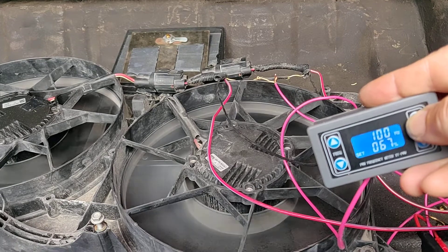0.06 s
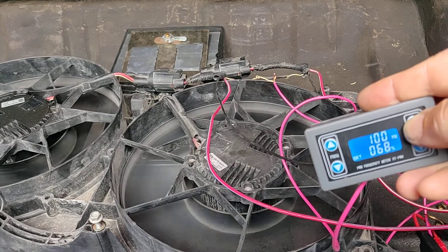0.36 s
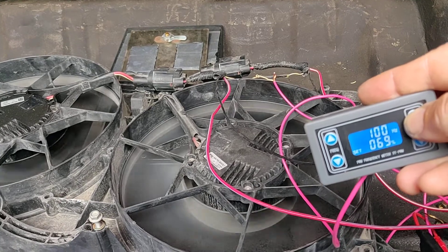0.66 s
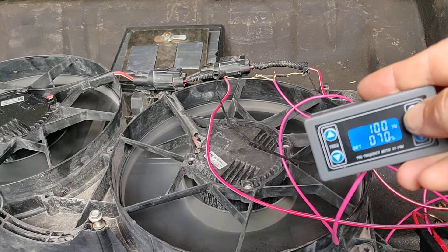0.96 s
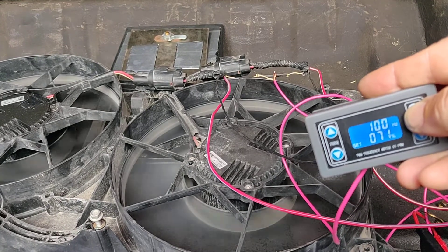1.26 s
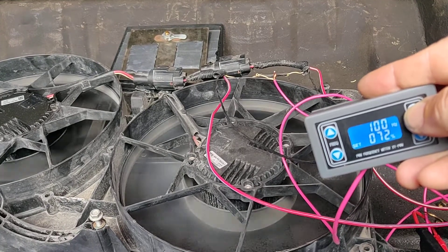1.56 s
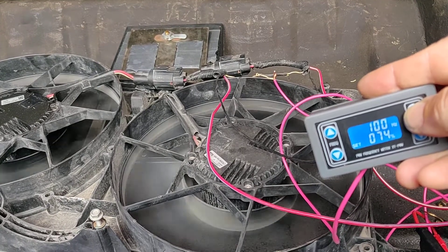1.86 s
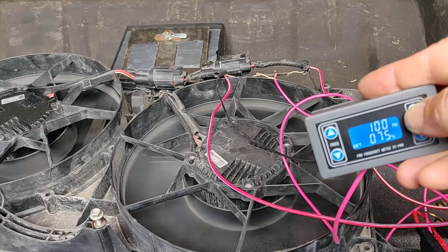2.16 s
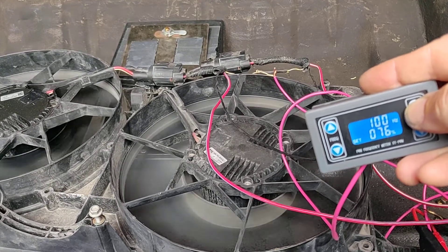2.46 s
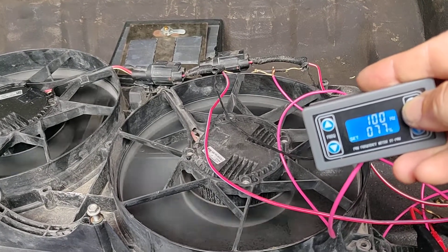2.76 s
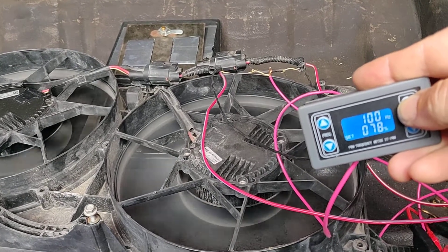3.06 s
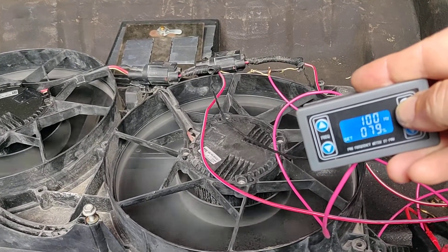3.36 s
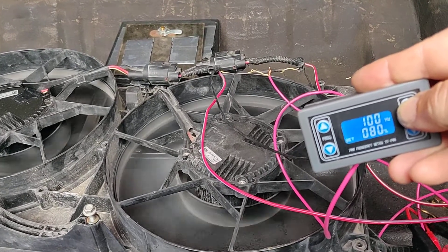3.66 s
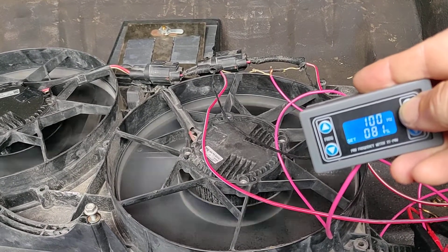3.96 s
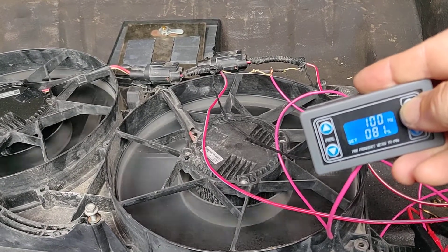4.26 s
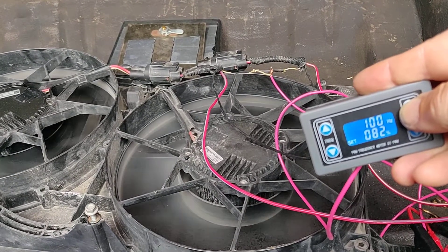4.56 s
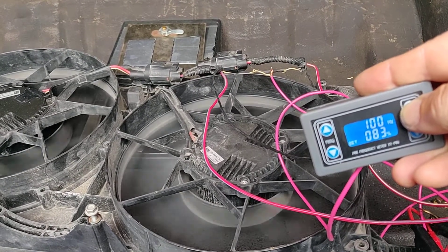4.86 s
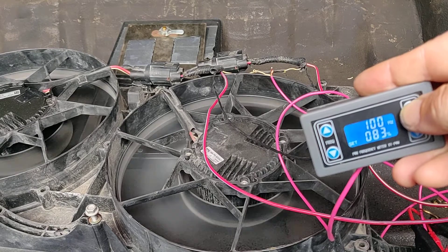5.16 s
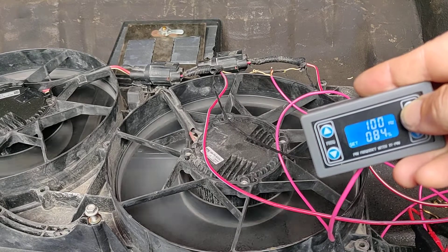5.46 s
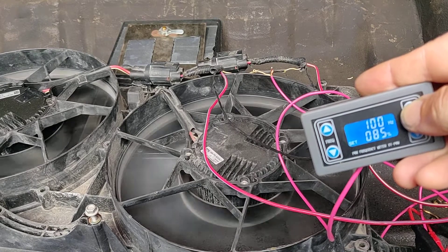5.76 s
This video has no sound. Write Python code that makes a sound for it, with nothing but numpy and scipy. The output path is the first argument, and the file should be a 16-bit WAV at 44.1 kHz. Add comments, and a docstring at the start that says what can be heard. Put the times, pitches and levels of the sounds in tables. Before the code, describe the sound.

A continuous rush of air comes from a pair of electric cooling fans just below the microphone, with ragged wind buffeting and rumble throughout, stronger on the left. A rough whine sits inside the noise and slowly becomes clearer. From the middle, a few short, faint, high whistling chirps come in small groups. The fan noise starts at its loudest and eases toward the end, while the gusts keep thumping.

```python
"""Two electric radiator fans run on a battery as their controller is turned up, a phone just above them.
Blade turbulence makes a broadband rush, coloured by the air resonances of the shrouds, with a hoarse
whine; midway a thin edge tone starts to chirp on and off. Eddies in the draught buffet the two
microphone ports, mostly the left, and the phone's limiter ducks everything after each hard gust."""
import sys
import numpy as np
from scipy import signal
from scipy.fft import rfft, irfft
from scipy.io import wavfile
from scipy.ndimage import uniform_filter1d, minimum_filter1d, map_coordinates

SR = 44100
rng = np.random.default_rng(int(sys.argv[2]) if len(sys.argv) > 2 else 0)


def to_wav(sig):
    """Store sig (one row per channel, or 1-D mono) as 16-bit WAV at the path in sys.argv[1].

    Samples outside -1..1 are clipped; the rate is SR.
    """
    pcm = np.clip(np.atleast_2d(sig), -1, 1) * 32767
    pcm = np.round(pcm).astype(np.int16)
    wavfile.write(sys.argv[1], SR, pcm.T)  # frames by channels


N = 265020
TIME = np.arange(N) / SR
FREQ = np.maximum(np.arange(N // 2 + 1) * SR / N, 1)

# Level of the rush and draught, which drops after the big gusts: t/s, relative level/dB
LEVEL = [(0, 3), (1.2, -0.5), (1.9, 0.3), (3.15, -1.6), (5.1, -5.5), (5.3, -9), (5.62, -7), (6, -8)]
# Relative spectrum of the rush up to about 9.8 kHz; above that, a barely audible hiss floor:
# f/Hz, left level/dB, right level/dB
RUSH_SPECTRUM = [(150, -40.5, -44.5), (314, -50.5, -51), (473, -54, -56.5), (795, -57.5, -56.5),
                 (1190, -56, -57), (1730, -55, -59.5), (2214, -57, -64), (3000, -63.5, -68.5),
                 (4500, -64.5, -71), (6100, -59.5, -75.5), (7060, -77.5, -72.5), (7330, -77, -75.5),
                 (8530, -99, -73.5), (9170, -108, -86.5), (9800, -113, -116), (12900, -105, -106),
                 (13500, -111, -112)]
# Air resonances of the shrouds, relative to that spectrum: f/Hz, width/Hz, left level/dB, right level/dB
SHROUD_MODES = [(403, 190, -2.5, -2), (557, 25.3, 8, 7), (657, 39, 3.5, 2.5), (855, 89, 6.5, 1.5),
                (1080, 58, 3.5, -5), (1236, 116, 2, -9), (1339, 39, 7, -11.5), (1588, 101, 2, -24.5),
                (1934, 55, -0.5, -22), (2158, 80, -1, -14), (2700, 220, 0, -26.5)]
# Relative spectral density of the steady draught: f/Hz, left level/dB, right level/dB
DRAUGHT_SPECTRUM = [(10, -40.5, -43.5), (30, -26.5, -26), (80.6, -28.5, -30.5), (166.5, -36.5, -31),
                    (273, -62, -81.5), (605, -83.5, -84), (1500, -122.5, -100)]
# Hard gusts (small, fast eddies carry little bass): t/s, length/s, peak level/dB, low f/Hz, top f/Hz, port
HARD_GUSTS = [(0.028, .03, 1.5, 75, 560, "left"), (0.103, 0.015, 3, 70, 420, "left"),
              (0.142, .036, 4.5, 65, 560, "left"), (0.17, 0.017, 9.5, 100, 890, "left"),
              (0.232, .01, 1.5, 298, 890, "left"), (0.321, 0.039, 9, 109, 504, "left"),
              (0.371, .034, -2, 30, 260, "left"), (.447, 0.021, 5.5, 129, 950, "left"),
              (0.464, .014, 7, 40, 180, "left"), (0.553, .02, 3, 60, 380, "left"),
              (0.575, .024, 6, 60, 440, "left"), (.696, .042, -5.5, 30, 300, "right"),
              (.757, 0.038, -1, 40, 480, "left"), (0.814, 0.057, 0.5, 26, 196, "right"),
              (0.907, 0.032, 2.5, 30, 504, "left"), (.925, .026, 4, 40, 456, "left"),
              (1.021, 0.02, 2, 91, 680, "left"), (1.088, 0.047, 4.5, 26, 266, "left"),
              (1.132, 0.03, 10, 35, 640, "left"), (1.273, 0.056, 1, 60, 635, "left"),
              (1.374, 0.033, -4, 26, 160, "right"), (1.421, 0.047, 2, 110, 380, "left"),
              (1.487, 0.032, -4.5, 30, 220, "left"), (1.519, 0.073, -4, 30, 220, "right"),
              (1.565, 0.056, -0.5, 35, 255, "left"), (1.636, 0.043, -6.5, 35, 260, "left"),
              (1.71, 0.041, -2, 50.3, 457, "left"), (1.776, .065, 0, 40, 376, "left"),
              (1.915, 0.026, -7.5, 26, 130, "right"), (2.079, .03, -2, 30, 200, "right"),
              (2.088, .028, 1, 138, 680, "left"), (2.131, 0.082, 0.5, 45, 450, "left"),
              (2.193, .025, -4.5, 35, 300, "left"), (2.264, 0.06, 0, 34.9, 443, "left"),
              (2.431, 0.031, .5, 45, 500, "left"), (2.545, 0.015, 2.5, 195, 704, "left"),
              (2.573, .056, 0.5, 70, 460, "left"), (2.647, .07, -1.5, 40.4, 243, "left"),
              (2.668, 0.017, 0.5, 26.3, 170, "right"), (2.811, .016, -1.5, 26, 150, "right"),
              (2.857, .068, 2, 38, 474, "left"), (3.122, 0.077, -7, 30, 232, "left"),
              (3.202, 0.017, 17.5, 45, 770, "left"), (3.354, .06, -3.5, 26, 140, "left"),
              (3.49, .06, -6.5, 25.8, 140, "left"), (3.522, .028, -2, 69.6, 554, "left"),
              (3.654, 0.023, 0.5, 26, 124, "right"), (3.786, 0.023, -12, 26, 180, "left"),
              (3.878, 0.015, 0.5, 89, 710, "left"), (4.123, .06, -2.5, 30, 282, "left"),
              (4.333, 0.052, 2, 30, 222, "left"), (4.508, 0.057, -0.5, 26, 191, "left"),
              (4.523, 0.037, -7, 30, 180, "right"), (4.579, .012, -0.5, 372, 1020, "left"),
              (4.586, 0.0097, -0.5, 40, 170, "left"), (4.675, 0.012, -0.5, 50, 330, "left"),
              (4.772, 0.036, -7.5, 26, 150, "right"), (4.894, .075, -5, 60.4, 313, "left"),
              (4.975, .036, -1, 40, 400, "left"), (4.986, 0.082, -5, 26, 226, "right"),
              (5.036, 0.034, -5, 35, 245, "left"), (5.127, .04, -12, 26, 150, "right"),
              (5.18, .034, -8, 49, 383, "left"), (5.2, 0.0094, 7.5, 40.6, 157, "left"),
              (5.409, 0.038, -2.5, 55, 370, "left"), (5.638, 0.082, -8.5, 26, 180, "right"),
              (5.778, 0.035, -13, 26, 160, "left"), (5.957, 0.023, 0, 168, 600, "left"),
              (5.989, .035, 3, 40, 382, "left")]
# Chirps of the edge tone: t/s, length/s, level/dB, f/Hz
CHIRPS = [(2.96, .11, -43, 2320), (3.11, .12, -45, 2316), (3.99, .04, -33, 2314), (4.045, .028, -38, 2330),
          (4.089, .048, -36, 2310), (4.505, .09, -43, 2304), (4.56, .048, -38, 2300),
          (4.648, .05, -38.5, 2305), (4.738, .062, -36.5, 2312)]


def undb(db):
    """Amplitude ratio of a level: a factor of ten for every 20 dB."""
    return 10 ** (np.asarray(db) / 20)


def noise(gain):
    """Filtered white noise: amplitude per root Hz follows gain, with one independent row per row of gain."""
    white = rng.standard_normal(np.shape(gain)[:-1] + (N,))
    return irfft(rfft(white) * gain, N) * np.sqrt(SR / 2)


def port_gains(spectrum):
    """Left and right frequency response, with level interpolated over log frequency."""
    hz, *sides = np.transpose(spectrum)
    return undb([np.interp(np.log(FREQ), np.log(hz), db) for db in sides])


def fluctuation(rate_hz):
    """Low-passed noise: a smooth random signal of unit standard deviation."""
    slow = noise(1 / (1 + (FREQ / rate_hz) ** 4))
    return slow / slow.std()


def swell(centre, length, steepness):
    """A rounded plateau whose full width at half height is length."""
    return 2 ** -np.minimum(np.abs(2 * (TIME - centre) / length), 10) ** steepness


def resonance(hz, width_hz):
    """Forced resonance: air driven by turbulence rings in a narrow band, with unit gain at the centre."""
    return noise(1 / (1 + ((FREQ - hz) / width_hz) ** 2) ** 1.24)


def blade_rush(hiss_db, diffuse_db=-3, direct_db=-8, flutter_db=1, low_hz=120, hiss_hz=3000, lag_s=65e-6):
    """Turbulence noise: a diffuse field, plus direct sound and shroud modes that reach the left first."""
    spectrum = port_gains(RUSH_SPECTRUM) / (1 + (low_hz / FREQ) ** 4)
    diffuse = noise(spectrum * undb(diffuse_db)) * undb(flutter_db * fluctuation(rate_hz=14))
    direct = rfft(noise(undb(direct_db)))
    for hz, width_hz, left_db, right_db in SHROUD_MODES:
        direct = direct + rfft(resonance(hz, width_hz)) * undb([[left_db], [right_db]])
    port_delay = np.exp(-2j * np.pi * FREQ * np.array([[0], [lag_s]]))
    rush = diffuse + irfft(direct * spectrum * port_delay, N)
    hiss = irfft(rfft(rush) / (1 + (hiss_hz / FREQ) ** 4), N)
    return rush + (undb(hiss_db) - 1) * hiss  # treble shelf of hiss_db


def whine(hz=1575, width_hz=33, wander_hz=16, right_db=-12):
    """Narrow-band noise is heard as a hoarse pitch; frequency modulation makes it wander."""
    ring = resonance(hz, width_hz)
    drift_samples = np.cumsum(wander_hz / hz * fluctuation(rate_hz=9))
    ring = map_coordinates(ring / ring.std(), [np.arange(N) + drift_samples], mode="mirror")
    return ring * undb([[0], [right_db]])


def draught(flutter_db=2.6, flutter_hz=11):
    """Turbulent pressure: small eddies rumble and flutter, uncorrelated between the two ports."""
    rumble = noise(port_gains(DRAUGHT_SPECTRUM))
    flutter = np.array([fluctuation(flutter_hz), fluctuation(flutter_hz)])
    return rumble * undb(flutter_db * flutter)


def gusts(rows, body_ratio=0.37, edge_speed=0.3, drive=0.45, ragged_db=3.5):
    """Convection: large eddies sweep past a port as ragged bursts, brightest where the air is fastest."""
    pressure = np.zeros(N)
    ragged = undb(ragged_db * np.tanh(fluctuation(rate_hz=70)))
    for centre, length, peak_db, low_hz, top_hz in rows:
        near = np.abs(TIME - centre) < 2 * length
        speed = (swell(centre, length, steepness=1.936) * ragged)[near]
        body_hz = max(body_ratio * top_hz, 2 * low_hz)
        body = signal.butter(1, [low_hz, body_hz], "bandpass", fs=SR, output="sos")
        rolloff = signal.butter(2, top_hz, fs=SR, output="sos")
        eddy = signal.sosfilt(body, rng.standard_normal(N // 8))
        eddy = signal.sosfilt(rolloff, eddy)
        # the swirls pass at the speed of the air, so the edges of the burst are dull
        travel = np.cumsum(edge_speed + (1 - edge_speed) * speed)
        eddy = np.interp(travel, np.arange(len(eddy)), eddy)
        burst = np.tanh(drive * eddy / eddy.std()) * speed  # the pressure peaks flatten off
        pressure[near] += undb(peak_db) * burst / np.abs(burst).max()
    return pressure


def puffs(mean_db, per_s=5, length_s=0.05, spread_db=3.5, low_hz=28, top_hz=290, db_per_octave=10.5):
    """Intermittent turbulence: soft eddies arrive at loosely even times, the stronger ones brighter."""
    jitter, weakness = rng.random((64, 2)).T
    times = (np.arange(len(jitter)) + jitter) / per_s
    extra_db = spread_db * (1 - 2 * weakness)
    return gusts([(t, length_s, mean_db + db, low_hz, top_hz * 2 ** (db / db_per_octave))
                  for t, db in zip(times, extra_db) if t < N / SR])


def edge_tone(waver_hz=11, sag_hz_per_s=500, rough_db=2.5, right_db=-2):
    """Edge tone: air whistles over an edge in short chirps, each sagging a little in pitch."""
    waver = waver_hz * fluctuation(rate_hz=75)
    whistle = np.zeros(N)
    for centre, length, db, hz in CHIRPS:
        pitch = hz + waver - sag_hz_per_s * np.clip(TIME - centre, -length, length)
        tone = np.sqrt(2) * np.sin(2 * np.pi * np.cumsum(pitch) / SR)
        whistle += undb(db) * swell(centre, length, steepness=3) * tone
    roughness = undb(rough_db * np.tanh(fluctuation(rate_hz=70)))
    return whistle * roughness * undb([[0], [right_db]])


def scene():
    """Superposition of the sound of the fans and the pressure of their draught on the ports."""
    level_db = np.interp(TIME, *np.transpose(LEVEL))
    rush = blade_rush(hiss_db=0.57 + 0.2 * level_db)  # the hiss fades a little faster than the body
    whine_db = -36 + 0.98 * TIME  # the whine stands out more as the controller is turned up
    fans = (rush + whine() * undb(whine_db)) * undb(level_db)
    whistle = edge_tone()
    rumble = draught() * undb(-10.5)
    hard = np.array([gusts([row[:-1] for row in HARD_GUSTS if row[-1] == port])
                     for port in ("left", "right")])
    soft = np.array([puffs(mean_db=-12), puffs(mean_db=-11.5)])
    wind = (rumble + soft) * undb(0.69 * level_db)  # sinks less steeply than the rush
    return fans + whistle + wind + hard


def limiter(x, ceiling=0.81, release_s=0.18, attack_samples=64):
    """Peak limiting: one gain for both ports drops just ahead of a peak and recovers exponentially."""
    reduction = 1 - ceiling / np.maximum(np.abs(x).max(axis=0), ceiling)
    release = np.exp(-TIME / release_s)
    gain = 1 - np.maximum.accumulate(reduction / release) * release
    look_ahead = minimum_filter1d(gain, 2 * attack_samples)
    return x * uniform_filter1d(look_ahead, attack_samples)


def record(dry):
    """Limited headroom and bandwidth: the phone holds down the gusts and cuts the treble above 13.5 kHz."""
    lowpass = signal.ellip(8, 0.2, 70, 13500, fs=SR, output="sos")
    return signal.sosfilt(lowpass, limiter(dry))


dry = scene()
out = record(dry)
to_wav(out)
```